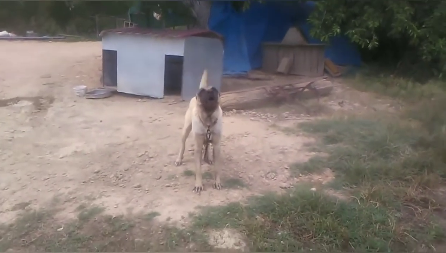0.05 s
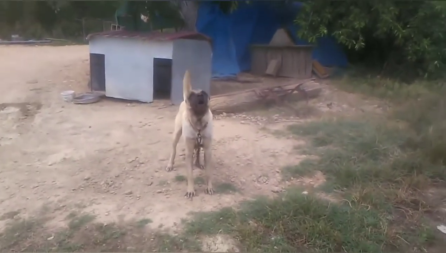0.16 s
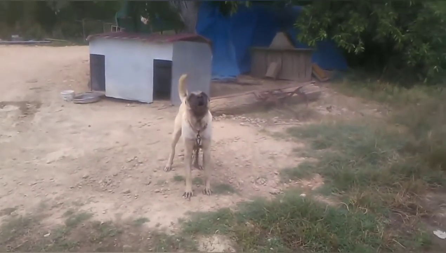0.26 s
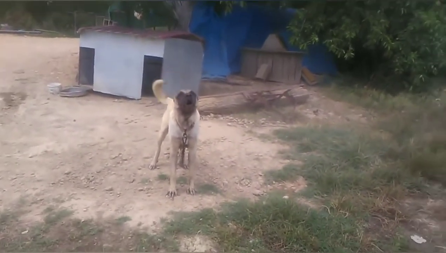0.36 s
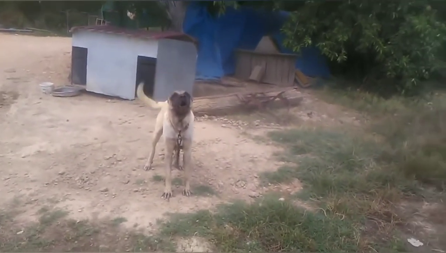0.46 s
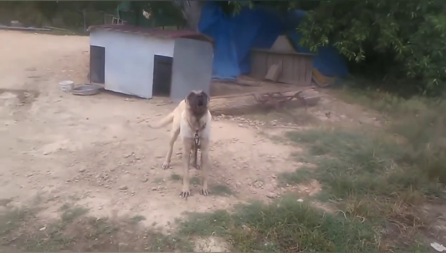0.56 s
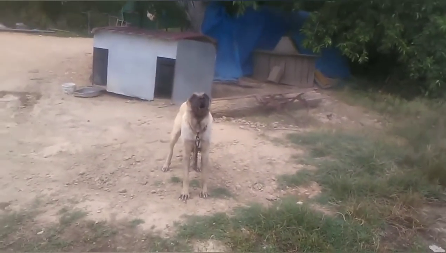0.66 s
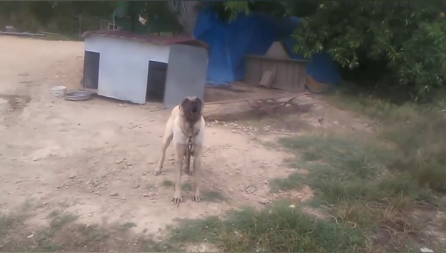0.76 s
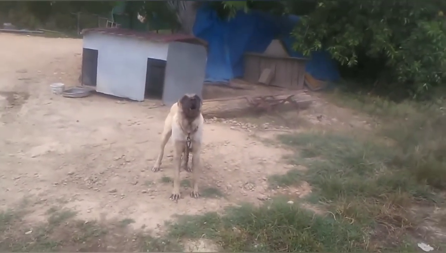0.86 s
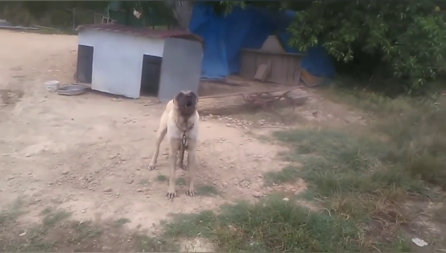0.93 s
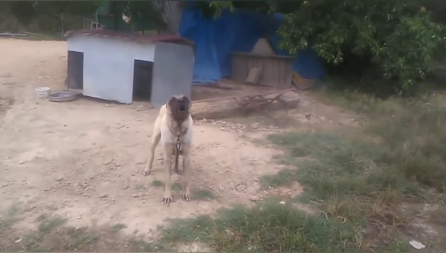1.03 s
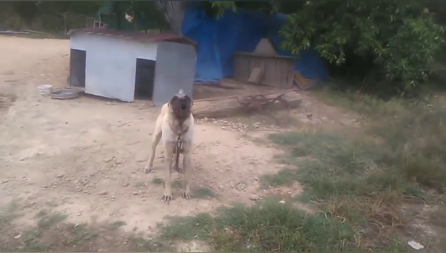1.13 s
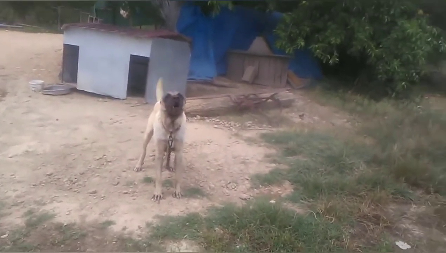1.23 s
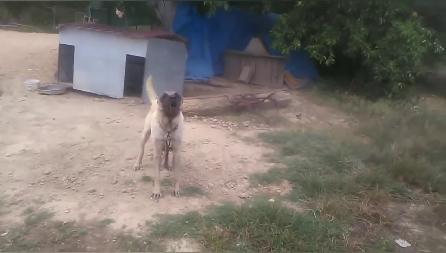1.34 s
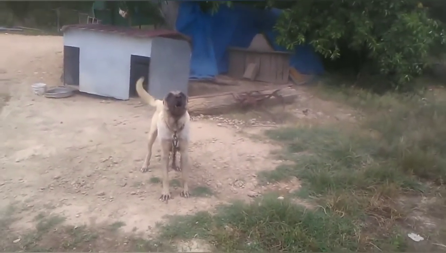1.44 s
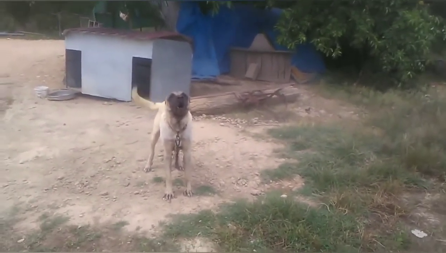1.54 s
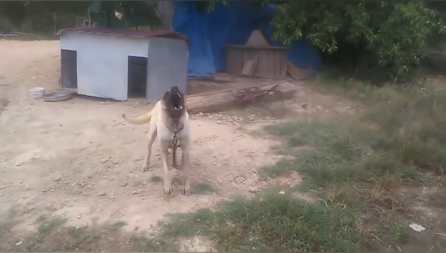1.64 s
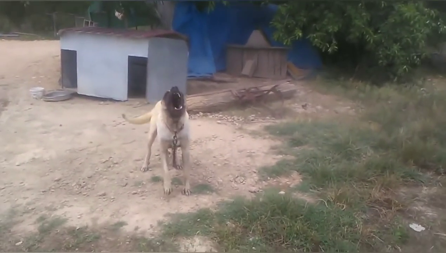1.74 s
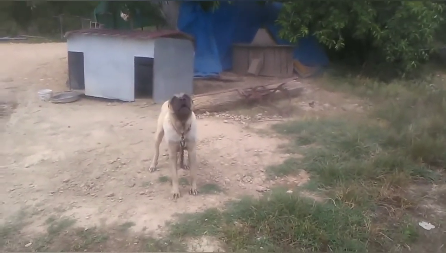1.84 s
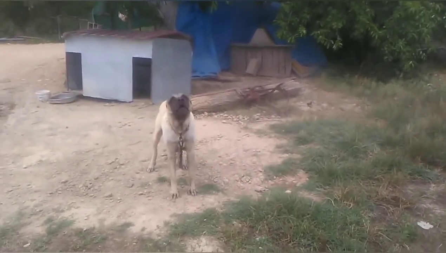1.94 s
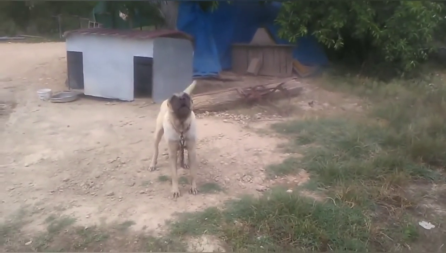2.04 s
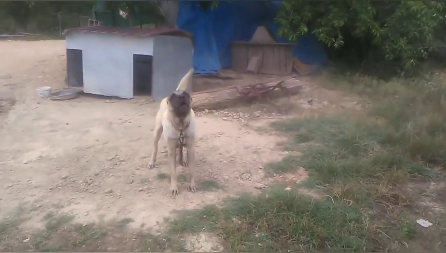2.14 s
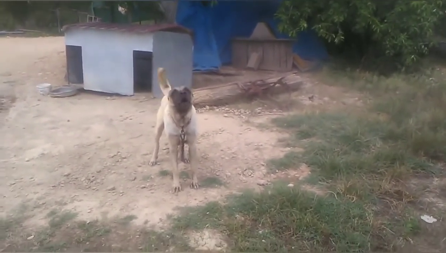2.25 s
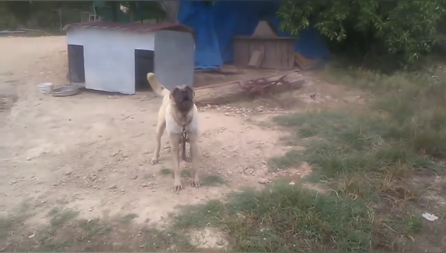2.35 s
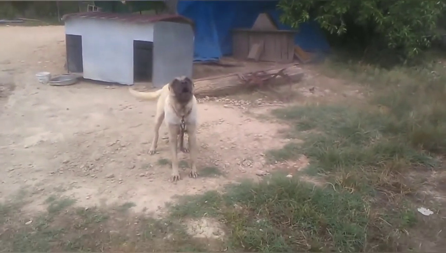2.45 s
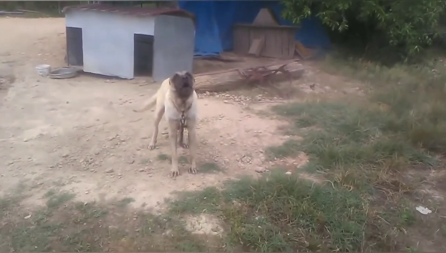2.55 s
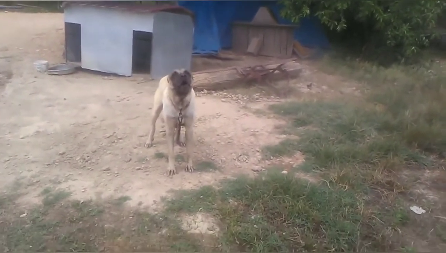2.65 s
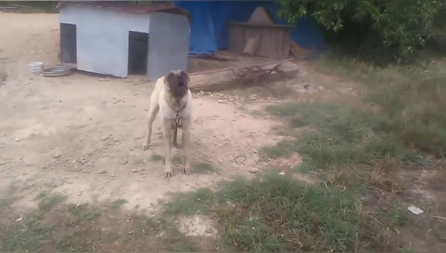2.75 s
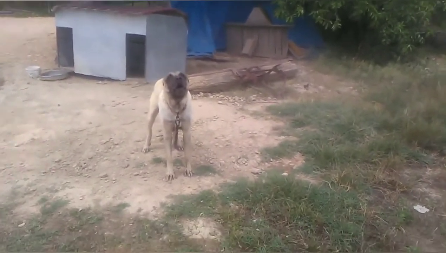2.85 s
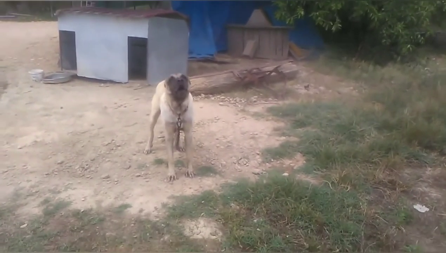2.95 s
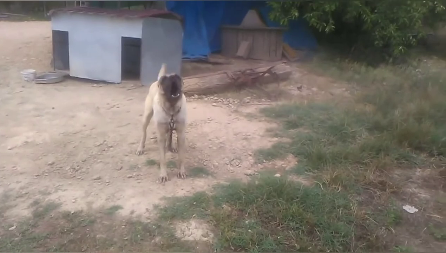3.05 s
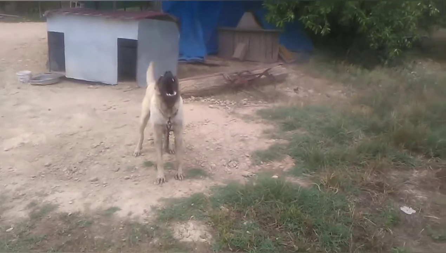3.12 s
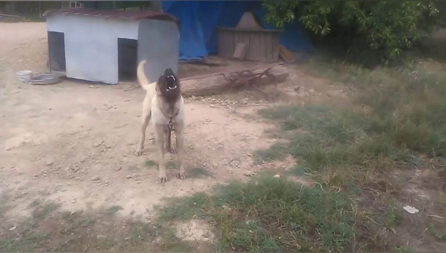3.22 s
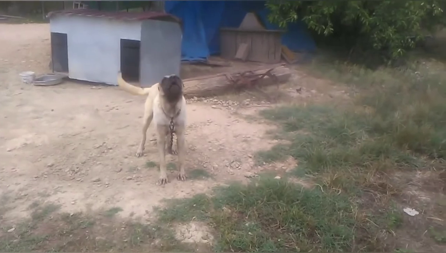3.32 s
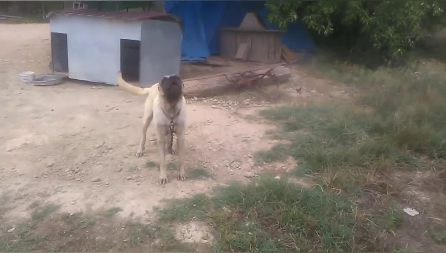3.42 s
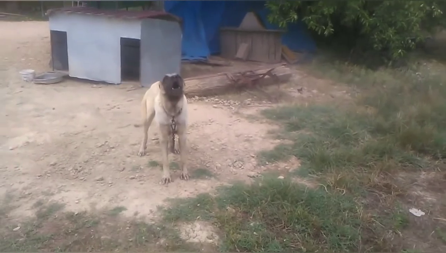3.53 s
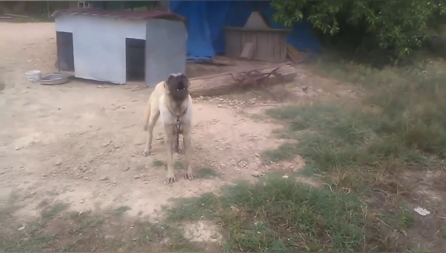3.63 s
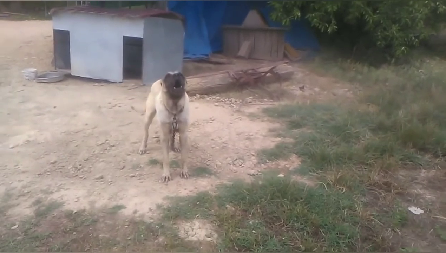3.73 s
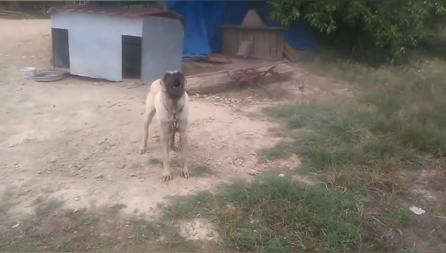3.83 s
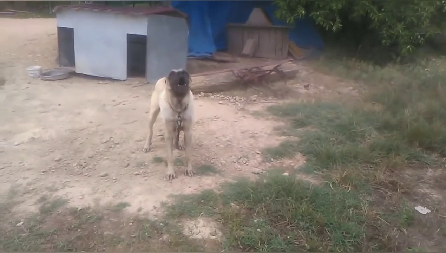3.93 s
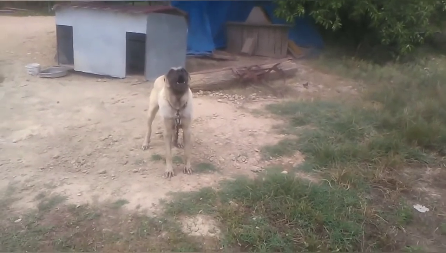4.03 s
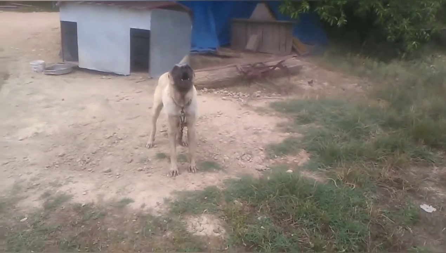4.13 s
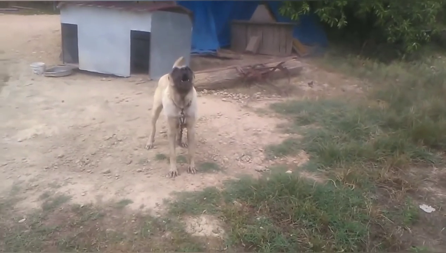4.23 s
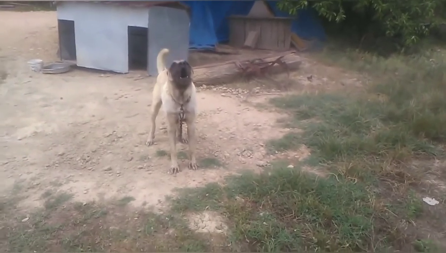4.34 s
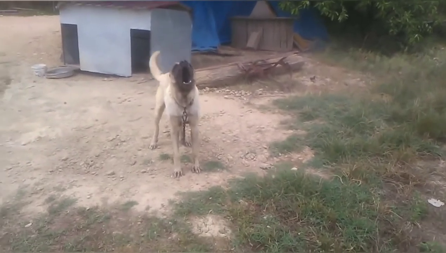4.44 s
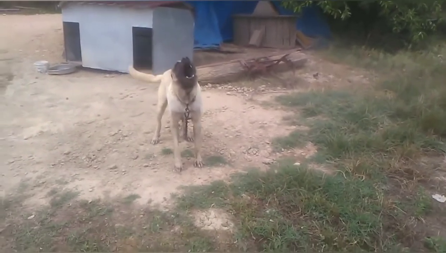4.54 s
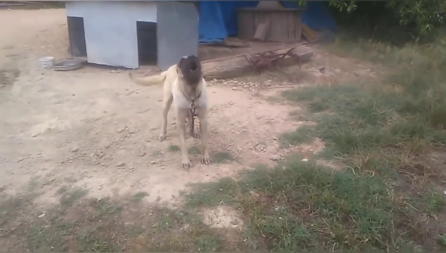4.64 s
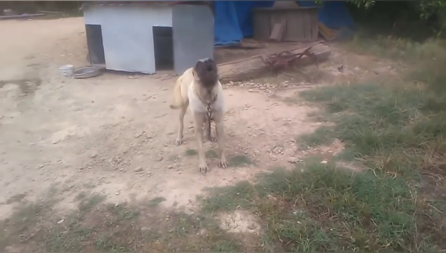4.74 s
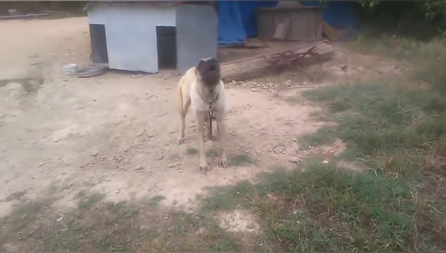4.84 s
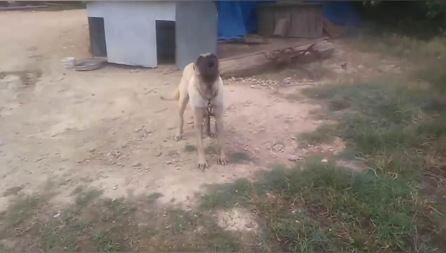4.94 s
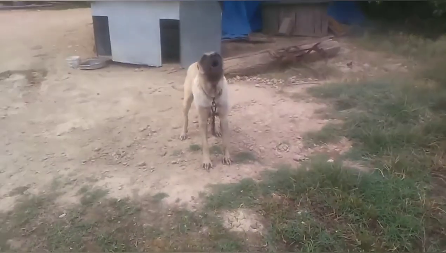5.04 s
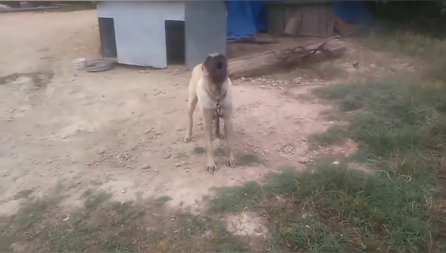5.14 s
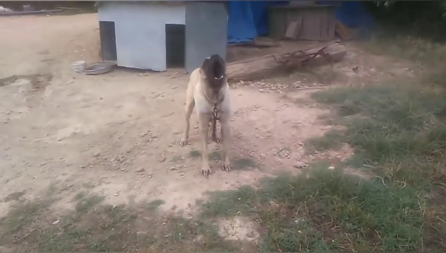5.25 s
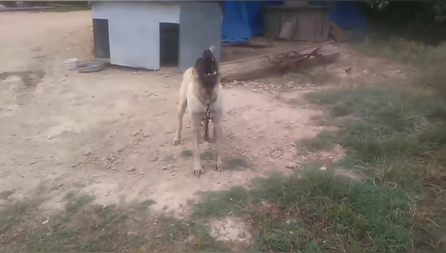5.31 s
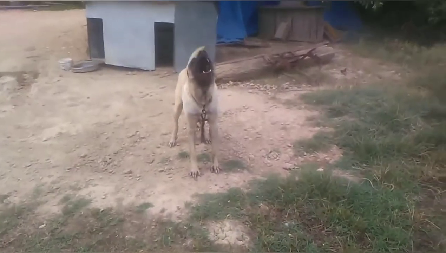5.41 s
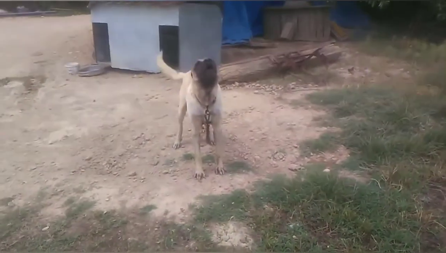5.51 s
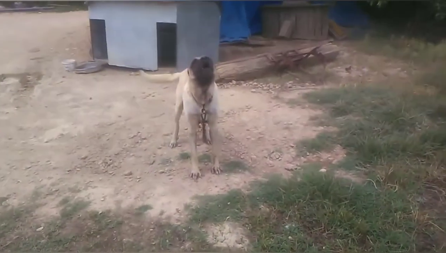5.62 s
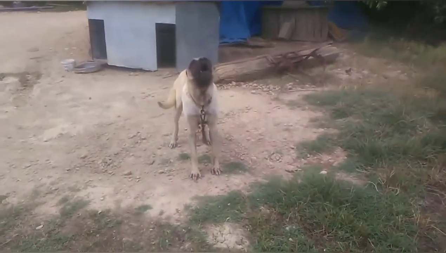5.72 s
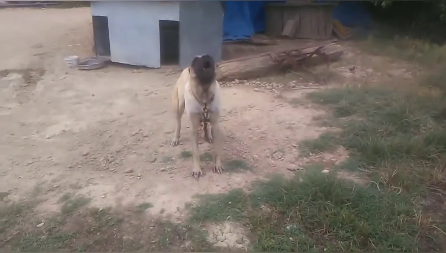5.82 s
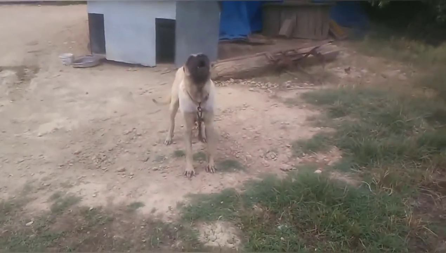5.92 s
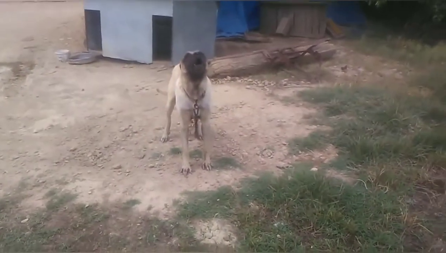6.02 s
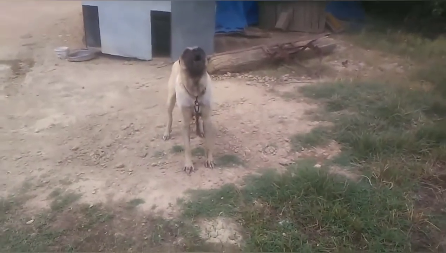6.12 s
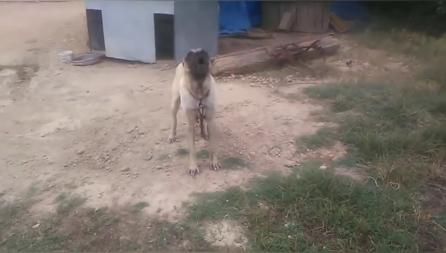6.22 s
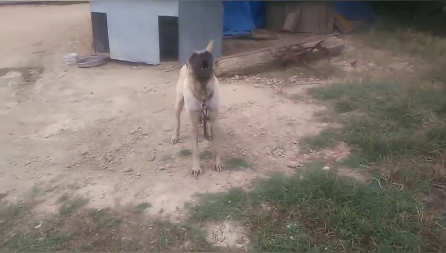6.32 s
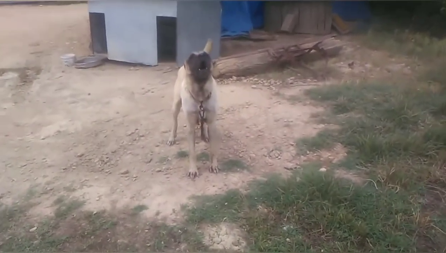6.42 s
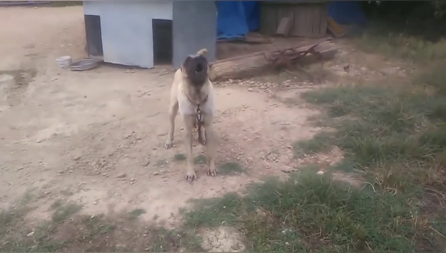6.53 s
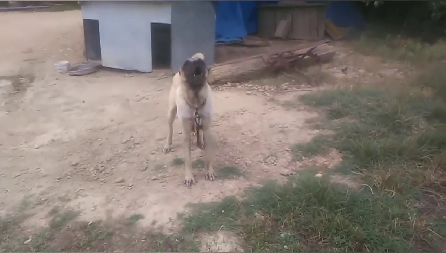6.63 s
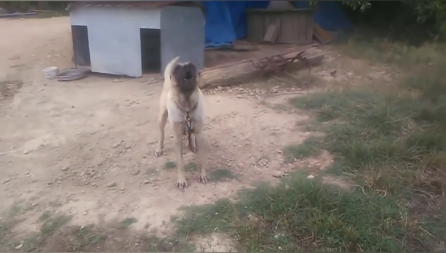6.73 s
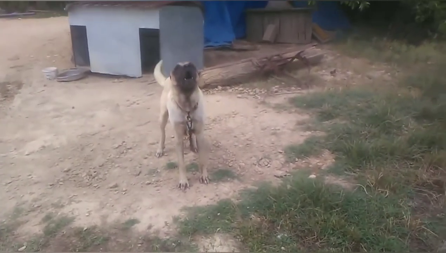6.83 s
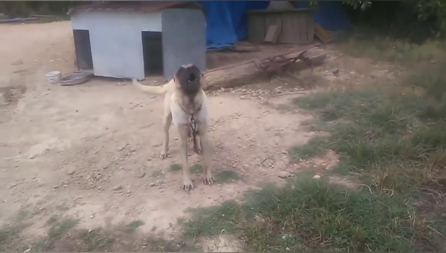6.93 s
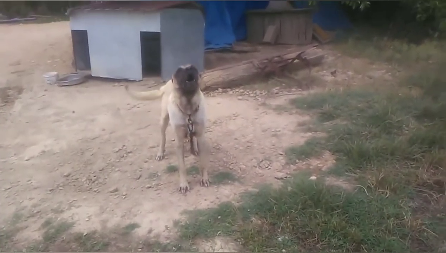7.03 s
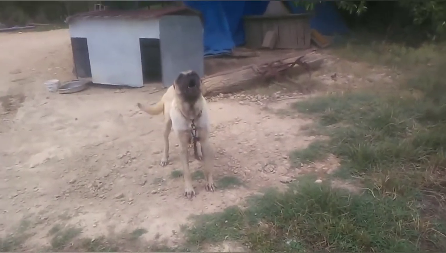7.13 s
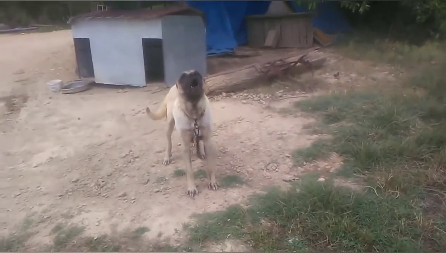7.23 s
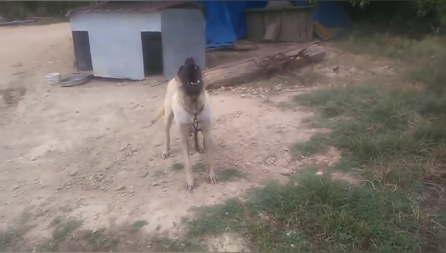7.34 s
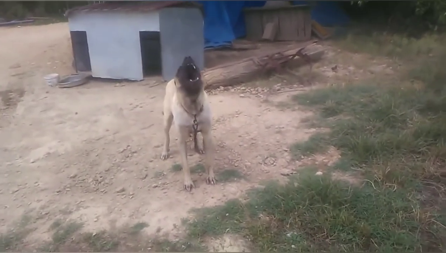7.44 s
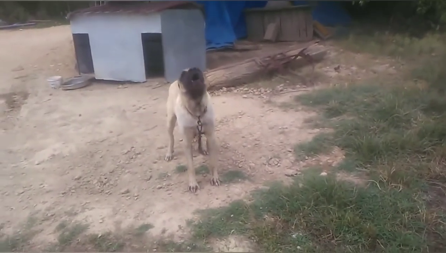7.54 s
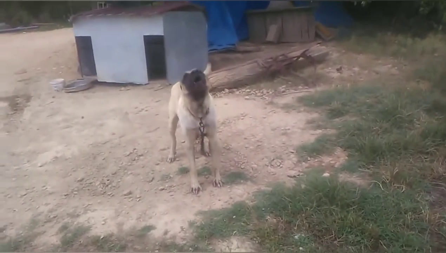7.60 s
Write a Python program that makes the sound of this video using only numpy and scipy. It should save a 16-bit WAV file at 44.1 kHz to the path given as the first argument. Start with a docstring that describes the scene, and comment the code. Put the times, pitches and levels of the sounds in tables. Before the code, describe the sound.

Deep rough barking from one big dog outdoors, single, then in close pairs, linked by rattling growls and raspy breaths over faint wind.

```python
"""A low growl and soft wind rumble open the scene; a dog then gives five deep, hoarse barks in a yard.
Folds and slapping tissue drive resonances of throat, mouth and muzzle; separate throbs frame the barks.
Snoring breaths are noise and a palate tone; wheezes, whistles and two far calls are wavering sines.
A soft whine follows the second bark. Filtered noise makes the hiss, the yard air, the wind, the echo
and an overload crackle on the loud moments."""
import sys
import numpy as np
from scipy import signal
from scipy.fft import rfft, irfft, next_fast_len
from scipy.io import wavfile
from scipy.ndimage import uniform_filter1d, minimum_filter1d

SR = 44100
rng = np.random.default_rng(int(sys.argv[2]) if len(sys.argv) > 2 else 0)


def store_wav(level_fs):
    """Save 16-bit WAV to argv[1]."""
    pcm = np.round(np.clip(np.atleast_2d(level_fs), -1, 1) * 32767)
    wavfile.write(sys.argv[1], SR, pcm.T.astype(np.int16))


N = 338247
T = np.arange(N) / SR  # s
SIZE = next_fast_len(N + SR // 2)
HZ = np.arange(SIZE // 2 + 1) * SR / SIZE

# Still air of the yard, relative spectrum: (frequency [Hz], level [dB])
YARD_SPECTRUM = [(26, 0), (42, -42), (100, -5.5), (170, -25.5), (450, -24), (2000, -36), (3200, -49),
                 (14000, -56.5)]
YARD_DB, WIND_DB = -36.5, -41

# Growls with the mouth nearly shut: (start [s], length [s], time to turning point [s],
# level there before surges [dB], fall away from it [dB/s], negative = rise, mouth opening [dB],
# upper resonances against the mouth's [dB])
GROWLS = [(0, 0.53, 0.025, -29.5, 11, -9, -12), (2.17, 1.083, 0.48, -17.5, 25.5, -9.5, -13),
          (4.94, 0.39, 0.028, -27.5, -6, -10, -14), (5.79, 0.56, 0.29, -22, 18, -5, -18)]
# Low resonances of the growl: (frequency [Hz], width [Hz], relative level [dB])
GROWL_LOW = [(129.6, 31, -19.5), (280.5, 80, -1), (392.5, 195, 0.5), (516, 250, -6)]
# Upper resonances of the growl: (frequency [Hz], width [Hz], relative level [dB])
GROWL_HIGH = [(1917, 164, 1.5), (2367, 94, 3), (2774, 79, -5.5), (5060, 1660, -11.5)]
# Harder slaps of the throat within the growls: (start [s])
SLAP_STARTS = [0.512, 2.441, 2.534, 2.583, 2.608, 2.744, 3.097, 6.005]
SLAP_DB, SLAP_S = 5.5, 0.017  # rise before the flutter is normalised; length
GROWL_HZ, GROWL_BEND = 384.5, 0.1189  # voice within the growl; its pitch swing (share)
GROWL_FLUTTER_DB, GROWL_VOICE_DB = 2.5, -15  # flutter before normalising; gain of the voice in the source
SURGE_DB, SURGE_S = 18, 0.098  # a growl swells close to a bark
GROWL_FADE_S, CHEST_DB = 0.16, -33

# Resonances of the hiss: (frequency [Hz], width [Hz], relative level [dB])
HISS_MODES = [(5000, 880, 3.5), (7890, 1600, 4.5), (11220, 2800, 2.5)]
# Hiss before the side gains: in a bark, relative to a growl, at rest
HISS_BARK_DB, HISS_GROWL_DB, HISS_REST_DB = -57, -33, -71.5

# Brief wheezes of the throat: (start [s], length [s], frequency [Hz], crest level [dB])
WHEEZES = [(.1, 0.22, 2260, -44.5), (2.113, 0.042, 2720, -36.5), (4.8, .028, 2000, -22),
           (4.868, 0.03, 1988, -19)]
# Thin whistles of the nose: (start [s], length [s], frequency [Hz], crest level [dB])
WHISTLES = [(6.99, 1, 1657, -35.5), (7.16, 0.5, 1425, -33.5)]

# Indrawn breaths: (start [s], length [s], build-up [s], rush level [dB], snore level [dB],
# hiss level before the side gains [dB])
INHALES = [(.62, 1.02, 0.11, -31.5, -25, -57.5), (3.742, 0.73, 0.13, -29, -41.5, -54),
           (6.47, 1.1, 0.11, -28.5, -31.5, -52)]
# Resonances of the nose: (frequency [Hz], width [Hz], relative level [dB])
NOSE = [(499, 164, 10.5), (735, 202, 7.5), (1068, 210, 8.5), (1615, 185, 8.5), (1914, 85, 10.5),
        (1940, 1100, 0.5), (3900, 1800, -17.5)]
RUSH_FALL_S, RUSH_EDGE_DB = 0.46, -8.5  # the flow dies away; its change of level at both ends
PUFF_DEPTH, PUFF_S = 0.75, 0.17  # the air comes in puffs at both ends of a breath
# The soft palate slows and weakens as the flow ends
SNORE_HZ, SNORE_SAG_HZ, SNORE_SAG_S, SNORE_EDGE_DB = 86.7, 24, 0.2457, -15
SNORE_RISE_S, SNORE_FIRST_DB = 0.16, -32  # the snore is slow to start

# Separate throbs of the throat around the barks: (start [s], length [s], pitch at mid-glide [Hz],
# crest level [dB], mouth opening [dB])
THROBS = [(1.694, 0.02803, 371, -9, -5), (1.734, 0.0379, 447.5, -7, -8.5), (2.088, 0.031, 301.7, -8.5, -11),
          (2.133, 0.035, 284.7, -10, -2), (2.171, 0.0275, 299, -15, -7), (3.139, 0.0259, 350, -9.5, -10.5),
          (3.173, 0.0405, 384.3, -7, -12.5), (3.619, 0.032, 265, -13, -4.5),
          (3.662, 0.02937, 247.5, -17.5, -6.5), (4.483, 0.0349, 374.5, -16, -8),
          (4.525, 0.0358, 388.3, -7.5, -9), (4.565, .039, 450, -5, -12), (4.917, 0.035, 397.6, -7.5, -1.5),
          (4.958, 0.023, 326.6, -18.5, -5), (5.014, 0.0276, 329.5, -15.5, -3.5),
          (5.269, 0.0335, 353, -7.5, -7.5), (5.311, 0.0426, 405.3, -6, -10),
          (5.708, 0.0403, 279.6, -10.5, -0.5), (5.751, 0.031, 250.9, -11, -9), (5.808, .068, 269, -19, -8),
          (7.418, 0.0224, 332.3, -17, -7), (7.449, 0.0325, 383.2, -6.5, -8),
          (7.492, 0.042, 456.4, -8.5, -1.5)]
LEAD_GLIDE_OCT, TAIL_GLIDE_OCT = 0.52, -.1  # up before a bark, down after it
TAIL_RASP_DB = -4  # gain of the rasp in the throbs after a bark
THROB_S = .044  # mean period of throbbing in barks, growls, whine and breath

# Barks: (start [s], length [s], time to crest [s], time to sink from it [s], first pitch [Hz],
# crest pitch [Hz], last pitch [Hz], level [dB], mouth opening [dB], jaw ring [dB], rasp after the crest [dB])
BARKS = [(1.78, 0.33, 0.13, 0.066, 456.3, 490, 299.7, -5.5, 1, -10.5, -4.5),
         (3.222, 0.37, 0.13, .15, 352.2, 469.3, 256.2, -6.5, 6, -13, 10.5),
         (4.608, 0.29, 0.062, 0.04, 381, 475, 384.3, -4, 7, -18, 2),
         (5.359, .342, .145, 0.13, 381.8, 490, 268.3, -4, 3.5, -16, 4),
         (7.537, 0.25, 0.045, 0.028, 387.5, 455, 370.2, -3, 13, -17, 4)]
# Resonances of the throat: (frequency [Hz], width [Hz], relative level [dB])
THROAT = [(325.3, 82, 3), (493.4, 81.6, 14)]
# Resonances of the fully open mouth: (frequency [Hz], width [Hz], relative level [dB])
MOUTH = [(752.6, 140, 0.5), (1059, 102, -5.5), (1199, 135, -6)]
# Resonances of the muzzle: (frequency [Hz], width [Hz], relative level [dB])
MUZZLE = [(1930, 306, 4.5), (2387, 160, -3.5), (4270, 6600, -20.5)]
# Resonances of the open jaws: (frequency [Hz], width [Hz], relative level [dB])
JAWS = [(1520, 320, 7.5), (1699, 68, 8), (4840, 3700, -23.5)]
BARK_SAG_DB, BARK_FADE_S = 6, 0.0064  # loss of level by the end; fade of the held part
ROUGH_FIRST, ROUGH_LAST, ROUGH_RISE_S = .3, 0.604, 0.1853  # hoarseness (0-1) outside yelps
MOUTH_SHUT_DB, MOUTH_OPEN_S, MOUTH_CLOSE_DB = -14.5, 0.2, 7  # opens quickly, half closes by the end
MOUTH_FULL_HZ, MOUTH_SAG = 457, 0.19  # below this pitch the resonances follow it down by this share
THROB_DRIFT, THROB_BEND = 0.92, 0.0664  # phase drift (radians); pitch swing (share) of the fundamental
THROB_LAST_DB = 4.5  # swing of level by the end of a bark
BARK_STUMBLE, TEAR_DB = .055, 1.5  # spread of pitch (share) and of level
BREAK_S, RASP_EASE_DB = .07, 13  # the tone breaks around the crest; the rasp eases by the end
# Yelps inside the barks: (start [s], length [s])
YELPS = [(1.879, 0.029), (1.952, 0.024), (3.484, .024), (4.622, 0.021), (4.706, 0.045), (4.787, .026),
         (4.829, 0.022), (5.456, .026), (5.501, 0.021), (5.574, 0.026), (7.591, 0.03)]
YELP_HZ = 386.3  # pitch approached at the middle of a yelp
YELP_THROAT_DB, YELP_MOUTH_DB = -7, 1  # the throat weakens and the mouth rings
CRACKLE_DB = -23  # overload crackle on the loud moments, timed with the yelps
# Band of the overload crackle: (frequency [Hz], width [Hz], relative level [dB])
CRACKLE_BAND = [(3610, 5100, 2.5)]

WHINE_START_S, WHINE_LENGTH_S = 3.732, .285
WHINE_FIRST_HZ, WHINE_LAST_HZ, WHINE_DB = 341, 310, -30.5
WHINE_SAG_DB, WHINE_ROUGH, WHINE_MOUTH_DB = 5, 0.296, -9  # loss of level, roughness (0-1), mouth gain

# Far calls: (start [s], length [s], time to crest [s], first pitch [Hz], last pitch [Hz], crest level [dB])
FAR_CALLS = [(6.02, .72, 0.38, 1263, 1277, -24), (6.94, .5, 0.18, 844, 716, -24)]
FAR_GLIDE_SHARE = 0.396  # middle share of a call that glides
FAR_FALL_DB_PER_S, FAR_OVERTONE_DB = 32, -24.5
FAR_WAVER, FAR_WAVER_DB = .021, 2.6  # spread of pitch (share) and of level

# Level of the left port against the right for the direct voice: (frequency [Hz], level [dB])
LEFT_SHADE = [(60, -2), (370, -1.7), (670, -2.5), (1230, -6), (2250, -1.5), (4110, 0), (7520, -12)]
LEFT_LAG_MS = 0.067
ECHO_DB, ECHO_T60_S = -22, .45
TOP_HZ = 14400


def undb(db):
    """Level law: decibels become an amplitude ratio."""
    return 10 ** (np.asarray(db) / 20)


def unit(x):
    """Normalisation: the effective (rms) amplitude becomes one."""
    return x / np.sqrt(np.mean(x ** 2))


def steady(x, seconds):
    """Level control: division by the running rms holds it near one."""
    k = max(int(seconds * SR), 8)
    power = uniform_filter1d(uniform_filter1d(x ** 2, k), k)
    return x / np.sqrt(np.abs(power) + 1e-9)


def noise():
    """White noise: independent Gaussian samples."""
    return rng.standard_normal(N)


def wobble(rate):
    """Random modulation: chance points, rate per second, are joined and scaled to an rms of one."""
    return unit(np.interp(T * rate, np.arange(8192), rng.standard_normal(8192)))


def ramp(x):
    """Linear transition: limited to zero and one."""
    return np.clip(x, 0, 1)


def swell(age, length):
    """Half-sine envelope: a rounded rise and fall over an event."""
    return np.sin(np.pi * ramp(age / length))


def window(age, length, fade):
    """Gating: open while an event lasts, with linear edges."""
    return ramp(np.minimum(age, length - age) / fade + .5)


def nearest(events):
    """Event timing: for each sample, the age of the nearest event, then its other columns."""
    rows = np.array(events, float)
    borders = (rows[:-1, 0] + rows[:-1, 1] + rows[1:, 0]) / 2
    start, *columns = rows[np.searchsorted(borders, T)].T
    return [T - start] + columns


def resonate(x, modes):
    """Minimum-phase resonance: steep-sided modes of given power, made causal through the cepstrum."""
    power = sum(undb(db) ** 2 / (1 + (2 * (HZ - hz) / width) ** 2 / 2) ** 3 for hz, width, db in modes)
    cepstrum = irfft(np.log(power + 1e-9) / 2, SIZE)
    # folding the cepstrum onto positive time gives the minimum phase
    cepstrum[1:SIZE // 2] *= 2
    cepstrum[SIZE // 2:] = 0
    response = np.exp(rfft(cepstrum))
    return unit(irfft(rfft(x, SIZE) * response, SIZE)[:N])


def flaps(hz, scatter, close):
    """Relaxation vibration: loose tissue opens at once and closes over a share of its uneven cycle."""
    phase = np.cumsum(hz * np.exp(scatter * wobble(90))) / SR
    puffs = np.exp(-(phase % 1) / close) * np.exp(scatter * wobble(70))
    return puffs / puffs.mean()


def folds(hz, rough, jitter=.11, slope=1.25, air_db=6, flap_hz=105):
    """Vocal-fold source: a harmonic buzz; roughness adds jitter, false-fold chopping and rushing air."""
    rough = np.clip(rough, 0, 1)
    phase = 2 * np.pi * np.cumsum(hz * np.exp(jitter * rough * wobble(170))) / SR
    buzz = sum(np.cos(k * phase) / k ** slope for k in range(1, 9))
    chop = flaps(flap_hz, scatter=.35, close=.55)
    air = undb(air_db) * rough * chop * noise()
    return buzz * (1 + rough * (chop - 1)) + air


def rasp():
    """Chaotic vibration: irregular bursts of noise dulled by a one-pole low-pass."""
    bursts = noise() * flaps(115, scatter=.4, close=.4)
    return unit(signal.lfilter([1], [1, -.95], bursts))


def through_mouth(x, hz, sinking):
    """Time scaling: a filter on a slowed clock lowers the mouth's resonances as the voice sinks."""
    clock = np.cumsum(1 - sinking * ramp(MOUTH_SAG * (1 - hz / MOUTH_FULL_HZ))) / SR
    on_clock = np.interp(T, clock, x)
    return np.interp(clock, T, resonate(on_clock, MOUTH))


def yard():
    """Ambient noise: partly shared coloured air, and low wind rumble independent on each microphone port."""
    hz, db = np.transpose(YARD_SPECTRUM)
    colour = undb(np.interp(np.log(HZ + 1), np.log(hz), db))
    common, left, right = (unit(irfft(rfft(noise(), SIZE) * colour, SIZE)[:N]) for _ in range(3))
    air = (common + 0.23 * np.array([left, right])) * undb(YARD_DB + wobble(1))
    wind = np.array([undb(side_db) * resonate(noise(), [(23.1, 64, 0)]) for side_db in (-3, 2.5)])
    return air + wind * undb(WIND_DB)


def growl_effort():
    """Amplitude envelope: each growl peaks or dips once, and is raised next to a bark."""
    age, length, turn_s, db, fall_db, *_ = nearest(GROWLS)
    bark_age, bark_length = nearest(BARKS)[:2]
    apart = np.maximum(np.maximum(-bark_age, bark_age - bark_length), 0)
    surge_db = SURGE_DB * np.exp(-apart / SURGE_S)
    return window(age, length, GROWL_FADE_S) * undb(db - fall_db * np.abs(age - turn_s) + surge_db)


def growl():
    """Pulse excitation: uneven, half-voiced slaps ring the nearly closed throat and shake the chest."""
    age, length, *_, mouth_db, upper_db = nearest(GROWLS)
    puffs = flaps(74, scatter=.28, close=.6)
    cycle = 2 * np.pi * age / THROB_S + 2.1 * wobble(14)
    voiced = folds(GROWL_HZ * (1 + GROWL_BEND * np.sin(cycle)), .5)
    clicks = unit(np.diff(puffs, prepend=0))
    source = unit(puffs * noise()) + 0.7 * clicks + undb(GROWL_VOICE_DB) * voiced
    low = steady(resonate(source, GROWL_LOW), 0.024)
    high = steady(resonate(source, MOUTH) + undb(upper_db) * resonate(source, GROWL_HIGH), 0.044)
    rumble = resonate(puffs * noise(), [(104.7, 82, 0)])  # chest: Hz, width Hz, dB
    chest = window(age, length, GROWL_FADE_S) * undb(CHEST_DB) * rumble
    slap = sum(swell(T - start, SLAP_S) for start in SLAP_STARTS)
    flutter = unit(undb(GROWL_FLUTTER_DB * np.cos(cycle) * (1 - slap) + SLAP_DB * slap))
    return growl_effort() * flutter * (low + undb(mouth_db) * high) + chest


def intake():
    """Flow modulation: the gate of each breath, puffing at both ends, and its slackness (0-1)."""
    age, length, rise_s = nearest(INHALES)[:3]
    slack = np.maximum(ramp(1 - age / rise_s), ramp(1 - (length - age) / RUSH_FALL_S))
    depth = PUFF_DEPTH * np.exp(-np.abs(np.minimum(age, length - age)) / PUFF_S)
    puffing = 1 - depth * np.cos(2 * np.pi * age / THROB_S)
    return window(age, length, fade=rise_s / 2) * puffing, slack


def hiss():
    """Turbulence noise: air at the teeth follows breath, bark and growl, stronger on the right."""
    gate, slack = intake()
    drawn = gate * undb(nearest(INHALES)[-1] + RUSH_EDGE_DB * slack)
    bark_age, bark_length = nearest(BARKS)[:2]
    barked = undb(HISS_BARK_DB) * window(bark_age + 2 * THROB_S, bark_length + 4 * THROB_S, fade=0.056)
    growled = undb(HISS_GROWL_DB) * growl_effort()
    power = drawn ** 2 + barked ** 2 + growled ** 2 + undb(HISS_REST_DB) ** 2
    size = np.sqrt(power) * undb(1.3 * wobble(45))
    left, right = (undb(side_db) * resonate(noise(), HISS_MODES) for side_db in (-10.5, 8.5))
    return size * np.array([left, right])


def wheezes():
    """Aerodynamic whistling: air in narrow gaps sings, roughly in the throat and thinly in the nose."""
    out = 0
    for events, waver in ((WHEEZES, .06), (WHISTLES, .012)):
        for start, length, hz, db in events:
            phase = 2 * np.pi * np.cumsum(hz * (1 + waver * wobble(500))) / SR
            out = out + undb(db) * swell(T - start, length) * unit(np.sin(phase))
    return out


def inhale():
    """Flow-induced flutter: the soft palate sounds a low snore and pulses the rush through the nose."""
    age, length, _, db, snore_db, _ = nearest(INHALES)
    gate, slack = intake()
    slowing = ramp(1 - (length - age) / SNORE_SAG_S)
    hz = SNORE_HZ - SNORE_SAG_HZ * slowing
    phase = 2 * np.pi * np.cumsum(hz * (1 + .04 * wobble(40))) / SR
    rush = resonate(noise() * (1 + 0.21 * np.sin(phase)) * undb(0.25 * wobble(32)), NOSE)
    onset_db = SNORE_FIRST_DB * ramp(1 - age / SNORE_RISE_S)
    snore = unit(np.sin(phase)) * undb(onset_db + SNORE_EDGE_DB * slowing + 1.6 * wobble(33))
    return gate * (undb(db + RUSH_EDGE_DB * slack) * rush + undb(snore_db) * snore)


def throbs():
    """Source and filter: single throat openings slide in pitch, hoarser when weak, rasping after a bark."""
    age, length, hz, db, mouth_db = nearest(THROBS)
    after = nearest(BARKS)[0] > 0
    glide = np.where(after, TAIL_GLIDE_OCT, LEAD_GLIDE_OCT)
    voiced = folds(hz * 2 ** (glide * (ramp(age / length) - .5)), rough=-.04 * db)
    source = voiced + after * undb(TAIL_RASP_DB) * rasp()
    muzzle = undb(-16.5) * steady(resonate(source, MUZZLE), 0.01)
    upper = steady(through_mouth(source, hz, after), 0.014) + muzzle
    low_after = steady(resonate(source, GROWL_LOW), 0.059)
    low_before = steady(resonate(source, THROAT), 0.013)
    colour = np.where(after, low_after, low_before) + undb(mouth_db) * upper
    return undb(db) * swell(age, length) * steady(colour, .008)


def bark():
    """Source and filter: a throbbing voice climbs, breaks into rasp and yelps, and rings the opening mouth."""
    (age, length, crest_s, sink_s, first_hz, crest_hz, last_hz,
     db, wide_db, jaws_db, rasp_db) = nearest(BARKS)
    yelp = swell(*nearest(YELPS))
    spent = ramp(age / length)
    sunk = 1 - np.exp(-(np.maximum(age - crest_s, 0) / sink_s) ** 2)
    hz = first_hz + (crest_hz - first_hz) * ramp(age / crest_s) + (last_hz - crest_hz) * sunk
    rough = (ROUGH_FIRST + (ROUGH_LAST - ROUGH_FIRST) * ramp(age / ROUGH_RISE_S)) * (1 - yelp / 2)
    mouth_db = wide_db + MOUTH_SHUT_DB * ramp(1 - age / MOUTH_OPEN_S) - MOUTH_CLOSE_DB * spent ** 2
    cycle = 2 * np.pi * age / THROB_S + THROB_DRIFT * ramp(age / THROB_S / 2) * wobble(15)

    # pitch climbs through each throb and drops back at the closure
    bend = THROB_BEND * (np.sin(cycle) + np.sin(2 * cycle) / 2)
    bent = hz * (1 + BARK_STUMBLE * wobble(45) - bend)
    voiced = folds(bent + yelp * (YELP_HZ - bent), rough)
    closing = spent ** 3  # the throat's resonance gives way to that of the growl
    broken = ramp((age - crest_s) / BREAK_S + .5) * (1 - yelp)
    source = voiced + broken * undb(rasp_db - RASP_EASE_DB * closing) * rasp()

    opening_db = mouth_db - 2.5 * np.cos(cycle) + 3.2 * wobble(65)
    throat = (1 - closing) * resonate(source, THROAT) + closing * resonate(source, GROWL_LOW)
    low = steady(throat, 0.024) * undb(YELP_THROAT_DB * yelp)
    mouth_gain = undb(opening_db + yelp * (YELP_MOUTH_DB - opening_db))
    mouth = steady(through_mouth(source, hz, age > crest_s), 0.026) * mouth_gain
    muzzle = steady(resonate(source, MUZZLE), 0.15) * undb(-17.5 + 0.55 * mouth_db)
    gape = ramp(np.minimum(age, length - age) / 0.021)  # the jaws part late and close early
    jaws_gain = undb(jaws_db + 1.34 * (mouth_db + opening_db) / 2)
    jaws = gape * steady(resonate(source, JAWS), 0.11) * jaws_gain
    crackle = yelp * undb(CRACKLE_DB) * resonate(rasp(), CRACKLE_BAND)  # overload, not voice

    throb_db = THROB_LAST_DB * spent ** 2 * np.cos(cycle) * (1 - yelp)
    level_db = db - BARK_SAG_DB * spent - throb_db + TEAR_DB * wobble(70)
    size = window(age, length, BARK_FADE_S) * undb(level_db)
    return size * (steady(low + mouth + muzzle + jaws, .012) + crackle)


def whine():
    """Source and filter: a fairly clear, sinking note throbs in level through throat and mouth, and fades."""
    age = T - WHINE_START_S
    spent = ramp(age / WHINE_LENGTH_S)
    source = folds(WHINE_FIRST_HZ + (WHINE_LAST_HZ - WHINE_FIRST_HZ) * spent, WHINE_ROUGH)
    colour = steady(resonate(source, THROAT) + undb(WHINE_MOUTH_DB) * resonate(source, MOUTH), 0.022)
    throb_db = 12.3 * np.cos(2 * np.pi * age / THROB_S)
    level_db = WHINE_DB - WHINE_SAG_DB * spent - throb_db
    return window(age, WHINE_LENGTH_S, fade=0.011) * undb(level_db) * colour


def far_calls():
    """Frequency modulation: two wavering tones with one overtone swell, slide in pitch and fade."""
    age, length, crest_s, first_hz, last_hz, db = nearest(FAR_CALLS)
    hz = first_hz + (last_hz - first_hz) * ramp((age / length - .5) / FAR_GLIDE_SHARE + .5)
    phase = 2 * np.pi * np.cumsum(hz * (1 + FAR_WAVER * wobble(250))) / SR
    level_db = db - FAR_FALL_DB_PER_S * np.abs(age - crest_s) + FAR_WAVER_DB * wobble(40)
    tone = unit(np.sin(phase) + undb(FAR_OVERTONE_DB) * np.sin(2 * phase))
    return window(age, length, fade=0.015) * undb(level_db) * tone


def echo(x):
    """Diffuse reflection: decaying dull noise per side stands for scatter from the sheds and trees."""
    tail = (T > .02) * undb(-60 * T / ECHO_T60_S)
    scatter = [signal.lfilter([1], [1, -.8], noise()) * tail for _ in range(2)]
    return np.array([signal.fftconvolve(x, s[:SR] / np.linalg.norm(s))[:N] for s in scatter])


def scene():
    """Interaural-like cues: sources right of centre reach the left port later and softer."""
    voice = growl() + wheezes() + inhale() + throbs() + bark() + whine() + far_calls()
    hz, db = np.transpose(LEFT_SHADE)
    shade = undb(np.interp(np.log(HZ + 1), np.log(hz), db))
    lag = np.exp(-2j * np.pi * HZ * LEFT_LAG_MS / 1000)
    left = irfft(rfft(voice, SIZE) * shade * lag, SIZE)[:N]
    return np.array([left, voice]) + undb(ECHO_DB) * echo(voice) + hiss() + yard()


def record(dry):
    """Peak limiting and band limiting: a fast common gain tames peaks, then a steep low-pass cuts the top."""
    need = np.minimum(1, undb(-1.8) / (np.abs(dry).max(axis=0) + 1e-9))
    gain = uniform_filter1d(minimum_filter1d(need, size=221), size=221)  # about 5 ms
    low_pass = signal.ellip(10, .2, 80, TOP_HZ, fs=SR, output="sos")
    return signal.sosfilt(low_pass, dry * gain)


dry = scene()
out = record(dry)
store_wav(out)
```